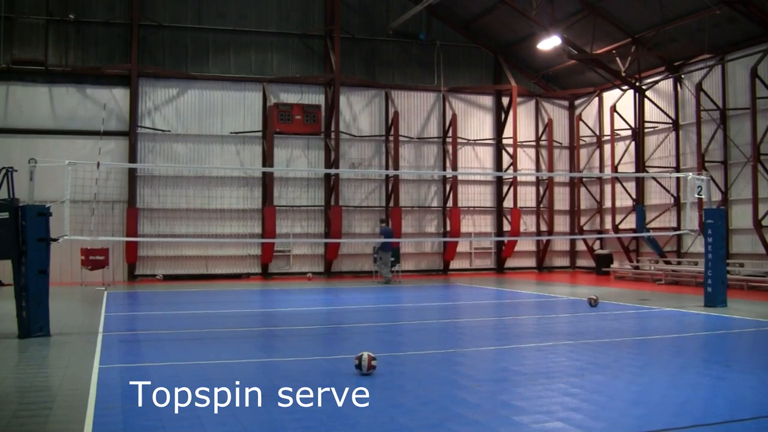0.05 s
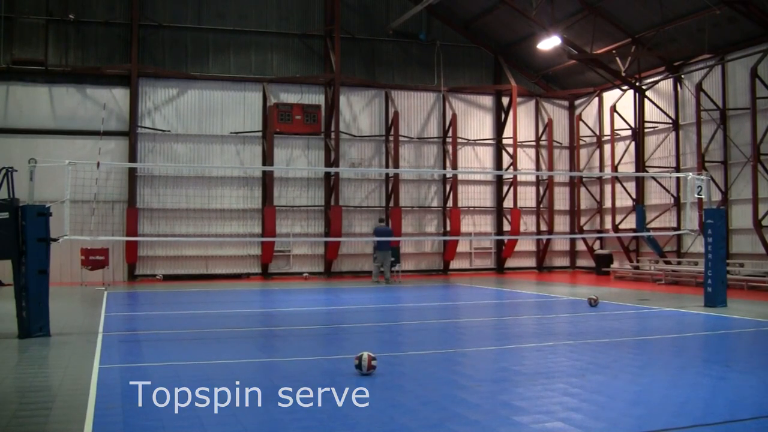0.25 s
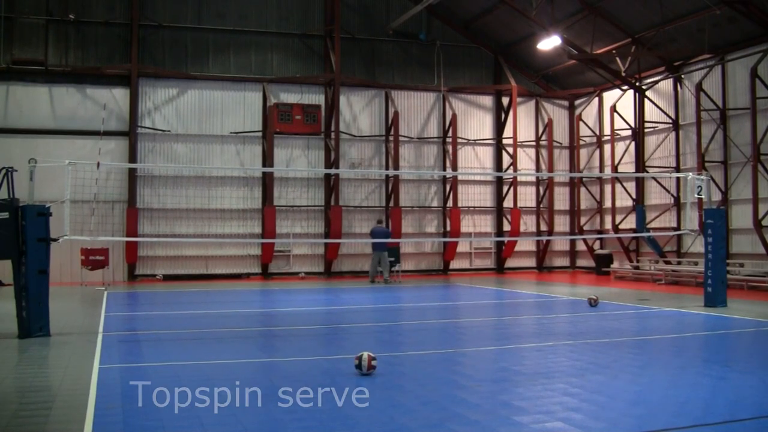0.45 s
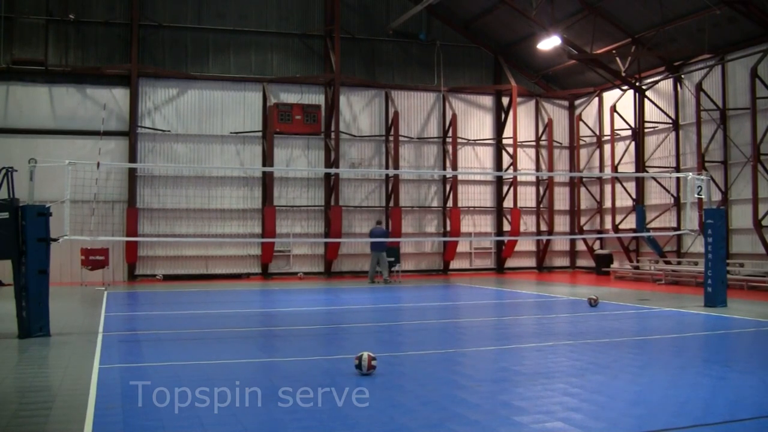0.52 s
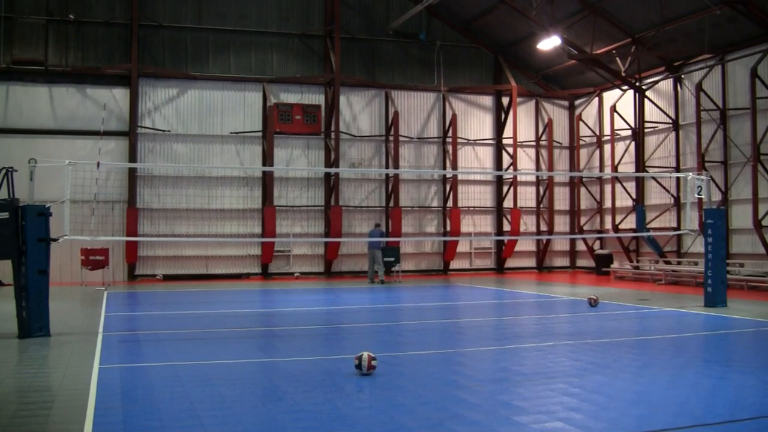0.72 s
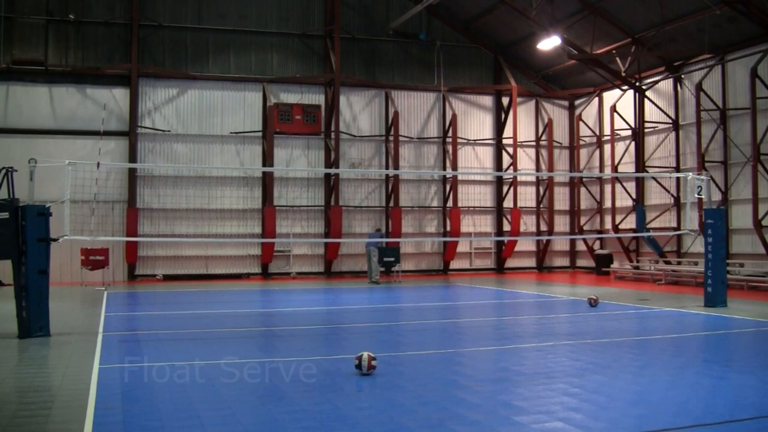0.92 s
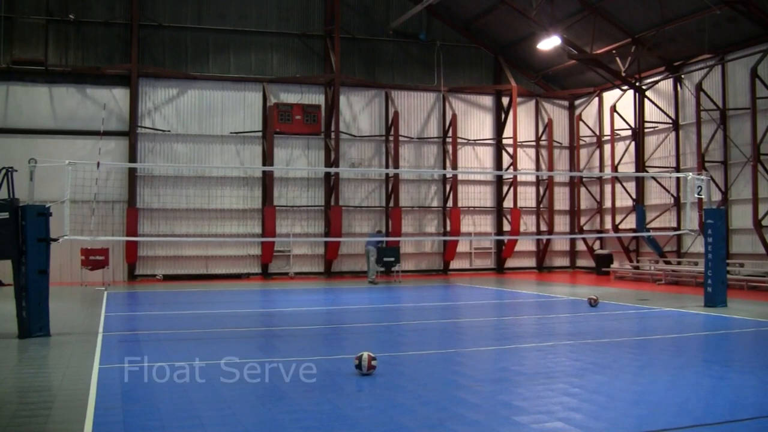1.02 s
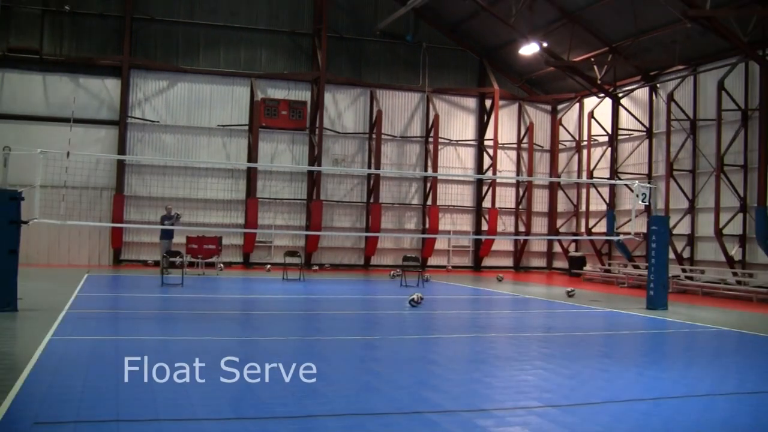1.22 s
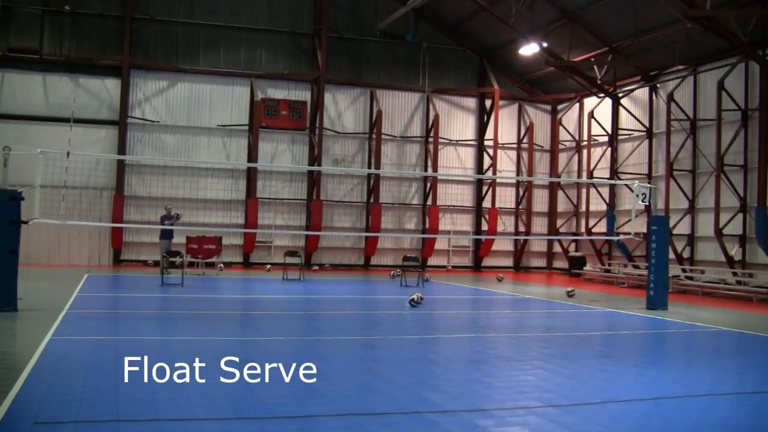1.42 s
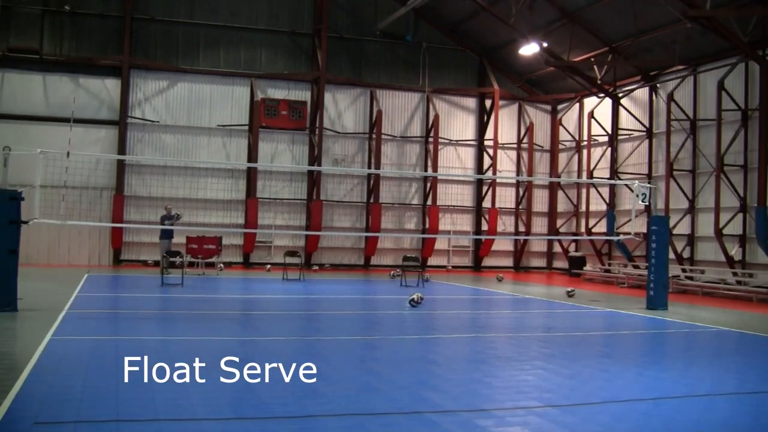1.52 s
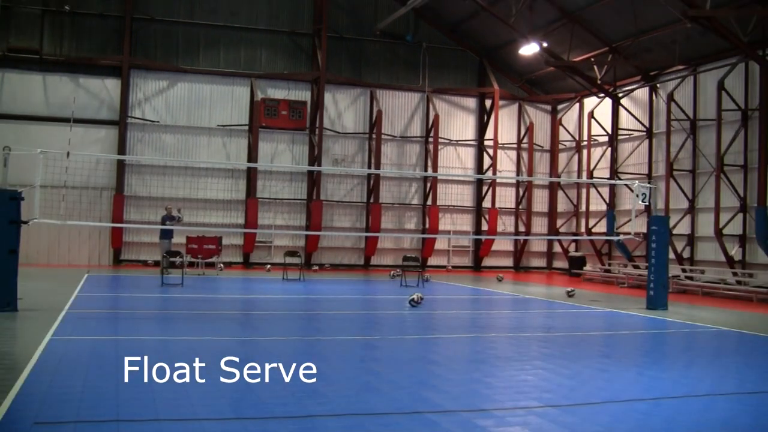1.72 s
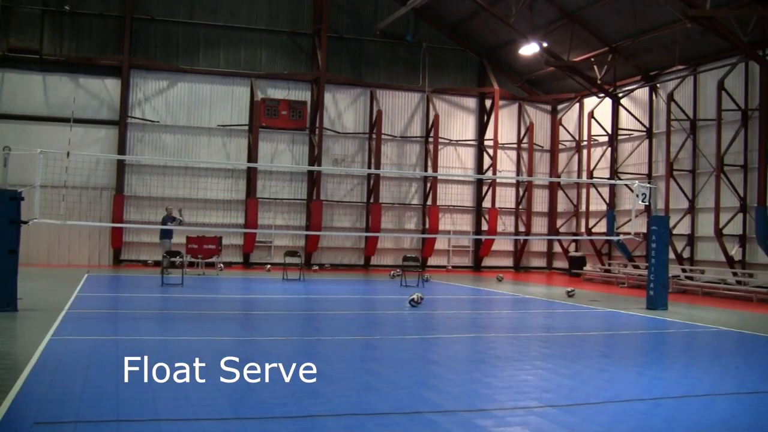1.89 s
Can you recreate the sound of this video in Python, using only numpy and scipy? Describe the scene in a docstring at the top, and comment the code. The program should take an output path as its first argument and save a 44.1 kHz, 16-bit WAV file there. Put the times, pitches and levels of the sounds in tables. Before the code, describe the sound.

A volleyball hits the floor close by at about 0.2 seconds, a hard slap with a hollow thump, over the faint fading ring of a large sports hall. The hit spreads into a long echo. After a faint tick at 1 second, the ball knocks against something nearby at 1.1 seconds. The echo cuts off right afterward, leaving only a low, steady ventilation rumble until about 2 seconds.

```python
"""A served volleyball lands close by in a big steel-clad sports hall: a hard slap and a hollow thump.
The impact excites damped modes and squashes the ball; reflections from walls and roof merge into a long
reverberant wash, over the fading ring of the serve, a steady ventilation rumble and two faint ticks.
The ball knocks against something nearby; just after, the hall's ring is cut off and only rumble stays."""
import sys
import numpy as np
from scipy import signal
from scipy.fft import rfft, irfft, next_fast_len
from scipy.io import wavfile

SR = 44100
rng = np.random.default_rng(int(sys.argv[2]) if len(sys.argv) > 2 else 0)


def generate_wav(signal):
    """Clip the signal to [-1, 1] and save it as 16-bit WAV at the path in sys.argv[1]."""
    frames = np.transpose(np.atleast_2d(signal))
    scaled = np.clip(frames, -1, 1) * 32767
    pcm = np.round(scaled).astype(np.int16)
    wavfile.write(sys.argv[1], SR, pcm)


N = 85995
TIME = np.arange(N) / SR
EARS = np.array([[1], [-1]])   # left, right
LANDING_S, KNOCK_S, CUT_S = .2314, 1.0972, 1.137


def from_db(db):
    """Amplitude ratio of a level."""
    return 10 ** (np.asarray(db) / 20)

def at_hz(points, hz):
    """Interpolation on a log-frequency axis."""
    f, value = np.transpose(points)
    return np.interp(np.log(np.maximum(hz, 1)), np.log(f), value)

def swell(start, rise, t60):
    """Smooth onset, then exponential decay of 60 dB in t60 seconds."""
    t = np.maximum(TIME - start, 0)
    return (1 - np.exp(-(t / rise) ** 2)) * np.exp(-np.log(1000) * t / t60)

def delayed(x, s):
    """A delay of s seconds is a phase shift proportional to frequency."""
    size = next_fast_len(2 * N)
    hz = np.fft.rfftfreq(size, 1 / SR)
    return irfft(rfft(x, size) * np.exp(-2j * np.pi * s * hz), size)[:N]

def cut(x, hz, kind, order):
    """Maximally flat low-pass or high-pass filter."""
    return signal.sosfilt(signal.butter(order, hz, kind, fs=SR, output="sos"), x + 1e-18)

# Interaural level difference: (frequency [Hz], left minus right [dB])
BALANCE = [(60, .5), (200, 1.9), (380, 1.1), (700, -1), (1300, -1), (4000, 0), (15000, -.3)]
def pan(hz):
    """Each ear takes half of the level difference."""
    return from_db(EARS * at_hz(BALANCE, hz) / 2)

# Width of the hall's sound field: (frequency [Hz], side minus mid [dB])
HALL_WIDTH = [(60, -21), (120, -24), (220, -16), (400, -9), (700, -13), (2200, -10), (4400, -5.5),
              (8000, -1.5), (11000, 7.5), (15000, 5)]
def noise(spectrum, width=HALL_WIDTH):
    """A diffuse field: noise only partly coherent between the ears."""
    size = next_fast_len(N)
    hz = np.fft.rfftfreq(size, 1 / SR)
    mid, side = rfft(rng.standard_normal((2, size)))
    spread = from_db(at_hz(width, hz))
    pair = (mid + EARS * spread * side) / np.sqrt(1 + spread ** 2)
    return irfft(pair * from_db(at_hz(spectrum, hz)) * pan(hz), size)[:, :N] * np.sqrt(SR / 2)

def burst(spectrum, start, db, t60):
    """A noise transient: the spectrum sets its colour, db its level."""
    x = noise(spectrum)
    return x / x.std() * from_db(db) * swell(start, .0001, t60)

# Reverberation time: (frequency [Hz], T60 [s])
HALL_T60 = [(60, 2.7), (130, 3.13), (500, 3), (1000, 3.33), (2500, 3.62), (5000, 2.66), (8000, 1.78),
            (11000, 1.3), (15000, .75)]
def reverberation(spectrum, start, rise, ripple_db=2.5, ripple_width_hz=16):
    """Each band decays at its own rate; the steel walls favour many narrow pitches."""
    size = next_fast_len(N)
    hz = np.fft.rfftfreq(size, 1 / SR)
    ripple = np.interp(hz / ripple_width_hz, np.arange(6000), rng.standard_normal(6000))
    panels = from_db(ripple_db * np.minimum(hz / 500, 1) * ripple)   # full depth above 500 Hz
    bins = rfft(noise(spectrum), size) * panels / np.sqrt(np.mean(panels ** 2))
    band = at_hz([(f, k) for k, (f, _) in enumerate(HALL_T60)], hz)
    return sum(irfft(bins * np.maximum(1 - abs(band - k), 0), size)[:, :N] * swell(start, rise, t60)
               for k, (_, t60) in enumerate(HALL_T60))

# Ring of the serve: (frequency [Hz], density [dB/Hz])
SERVE = [(60, -77), (130, -59), (300, -71.5), (650, -68.5), (820, -71.5), (950, -62.5), (1150, -69),
         (1800, -70.5), (2600, -69), (4200, -74.5), (5500, -84), (8000, -101), (15000, -115)]
def serve_ring():
    """Free decay of the serve's sound, already in the air."""
    return reverberation(SERVE, start=-.02, rise=.012)

# Air noise: (frequency [Hz], density [dB/Hz])
RUMBLE = [(25, -80), (40, -77), (62, -70.5), (100, -63), (165, -57.5), (215, -64), (350, -68), (550, -69.5),
          (900, -74), (1300, -77.5), (2000, -83.5), (2350, -82.5), (3000, -87), (4000, -90.5), (5200, -91),
          (8000, -99.5), (12000, -102.5), (16000, -102)]
# Its width: (frequency [Hz], side minus mid [dB])
RUMBLE_WIDTH = [(60, -26), (120, -21.5), (220, -14.5), (400, -6.5), (1000, -7.5), (2400, -7.5), (8000, -2),
                (15000, 2)]
# Wavering of its bass: (time [s], gain [dB])
BASS_GAIN = [(0, 2), (1.1, 1), (1.32, 2), (1.47, -5.5), (1.62, -0.5), (1.68, 3), (1.95, -0.5)]
def ventilation(bass_below_hz=240):
    """Broadband air noise, slowly amplitude-modulated in the bass."""
    air = noise(RUMBLE, RUMBLE_WIDTH)
    bass = signal.sosfiltfilt(signal.butter(2, bass_below_hz, fs=SR, output="sos"), air)
    gain = from_db(np.interp(TIME, *np.transpose(BASS_GAIN)))
    return air + bass * (gain - 1)

# Faint ticks: (time [s], level [dB])
TICKS = [(.199, -53), (1.0205, -41)]
# Their spectrum: (frequency [Hz], relative level [dB])
TICK_SPECTRUM = [(1000, -20), (3500, -3), (5500, 3), (9000, -3), (12000, -10), (16000, -14)]
def ticks():
    """Quickly damped bursts of bright noise."""
    return sum(burst(TICK_SPECTRUM, s, db, t60=.026) for s, db in TICKS)

# Interaural time difference: (frequency [Hz], lead of the right ear [s])
MODE_LEAD = [(350, 0.00021), (700, .00014), (2400, 0.00005), (15000, 0.000059)]
# Crack of the ball's skin: (frequency [Hz], relative level [dB])
CRACK = [(200, -5), (700, 0.5), (1500, -1), (2500, 2), (3400, -8), (5000, -5.5), (8000, -11),
         (12000, -16.5), (16000, -17)]
def impact(start, modes, contact):
    """Impulsive excitation: a click, damped modes, the skin's crack and its scattered tail."""
    click_db, click_top_hz, crack_db, crack_t60, scatter_db, lead = contact
    click = from_db(click_db) * signal.unit_impulse(N, int(start * SR))
    click = cut(click, click_top_hz, "low", order=2)
    click = cut(click, 1290, "high", order=1)
    x = np.array([delayed(click, lead), click])
    for delay, hz, db, attack, t60 in modes:
        onset = start + delay
        ring = from_db(db) * np.sin(2 * np.pi * hz * (TIME - onset)) * swell(onset, attack, t60)
        x += pan(hz) * np.array([delayed(ring, at_hz(MODE_LEAD, hz)), ring])
    return x + burst(CRACK, start, crack_db, crack_t60) + burst(CRACK, start, scatter_db, t60=.091)

# Ball on floor: (delay [s], frequency [Hz], level [dB], attack [s], T60 [s])
LANDING_MODES = [(0, 647, -1.5, 0.000084, .015), (0, 786, -11.5, 0.000092, 0.019),
                 (0, 996, -16.5, .0001, 0.011), (.001, 388, -17, 0.0022, 0.03),
                 (.006, 290, -18, 0.00103, 0.0284), (0, 1470, -16, 0.00011, .006),
                 (0, 2387, -5, .0001, 0.0093), (0, 4680, -7, 0.000091, .008), (0, 6750, -18, 0.00009, .005),
                 (0, 8260, -20, .0001, .005)]
# Contact: (click [dB], click top [Hz], crack [dB], crack T60 [s], scatter [dB], right-ear lead [s])
LANDING_CONTACT = (5, 7500, -14, .011, -27.5, .00007)
def landing(thump_hz=128, thump_db=-8.5, thump_s=.018):
    """Elastic collision: a slap, and a thump as the ball squashes faster than it springs back."""
    t = np.clip(TIME - LANDING_S, 0, thump_s)
    squash = np.sin(np.pi * (t / thump_s) ** .64) ** 1.24
    thump = -from_db(thump_db) * np.sin(2 * np.pi * thump_hz * t) * squash
    return impact(LANDING_S, LANDING_MODES, LANDING_CONTACT) + pan(thump_hz) * thump

# Distinct echoes of the landing: (time [s], gain [dB])
ECHOES = [(.2743, -13.5), (.2803, -14), (.2833, -4), (.2886, -6.5), (.2899, -20), (.3105, -14.5),
          (.3166, -12)]
# Early reflections, main wash and return from the far end: (frequency [Hz], density [dB/Hz])
EARLY = [(50, -95), (140, -61), (270, -69), (400, -50), (500, -60), (630, -47.5), (760, -52), (900, -63),
         (1500, -60), (2200, -60), (3600, -74.5), (5300, -67), (8000, -75.5), (15000, -88)]
WASH = [(30, -92), (60, -64), (120, -46.5), (170, -53.5), (250, -61.5), (360, -64.5), (500, -60.5),
        (610, -55), (800, -59.5), (1400, -61), (1900, -64), (2500, -61), (3200, -67.5), (4000, -73.5),
        (5200, -70), (8000, -81.5), (11000, -87), (15000, -90)]
FAR_RETURN = [(60, -76), (130, -52), (300, -69), (600, -63.5), (1200, -66), (2500, -67), (4000, -77.5),
              (7000, -86), (11000, -92.5), (15000, -88)]
def hall_response(slap):
    """Multiple reflection: dull, delayed copies of the slap thicken into a diffuse field."""
    dull = cut(slap[1], 680, "high", order=1)
    dull = cut(dull, 2650, "low", order=2)
    echoes = sum(from_db(db) * delayed(dull, s - LANDING_S) for s, db in ECHOES)
    early = noise(EARLY) * swell(start=.272, rise=.012, t60=.3)
    wash = reverberation(WASH, start=.2654, rise=.02)
    far_return = reverberation(FAR_RETURN, start=.398, rise=.04)
    return echoes + early + wash + far_return

# Ball on obstacle: (delay [s], frequency [Hz], level [dB], attack [s], T60 [s])
KNOCK_MODES = [(.0026, 348, -3.5, .001, .022), (.0028, 440, -13, .001, .015),
               (.003, 530, -8.5, .0016, .022), (.0035, 112, -13.5, .001, .06),
               (.0002, 2290, -18, .0001, .011), (.0002, 2650, -26, .0001, .01), (0, 930, -26, .0001, .02),
               (0, 14500, -19, .00003, .001)]
# Contact: (click [dB], click top [Hz], crack [dB], crack T60 [s], scatter [dB], right-ear lead [s])
KNOCK_CONTACT = (8.5, 10500, -26, .009, -32.5, .00004)
def knock():
    """A second collision, with one faint reflection from a surface close by."""
    return impact(KNOCK_S, KNOCK_MODES, KNOCK_CONTACT) + burst(CRACK, start=1.1105, db=-40, t60=.026)

def scene():
    """Superposition of the sources; all but the ventilation stop at CUT_S."""
    slap = landing()
    events = slap + knock() + serve_ring() + ticks() + hall_response(slap)
    gate = np.clip(.5 + (CUT_S - TIME) / .01, 0, 1)   # 10 ms fade
    return events * gate + ventilation()

def record(dry, low_hz=66, top_hz=16800):
    """Band limiting and overload: the microphone drops deep bass, clips peaks and cuts the top."""
    clipped = np.clip(cut(dry, low_hz, "high", order=2), -1, 1)
    return signal.sosfiltfilt(signal.cheby2(12, 50, top_hz, fs=SR, output="sos"), clipped)


dry = scene()
out = record(dry)
generate_wav(out)
```